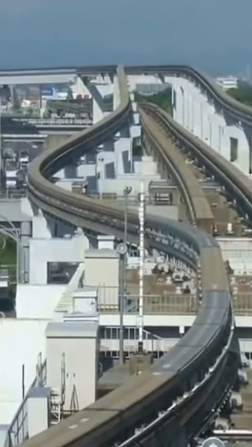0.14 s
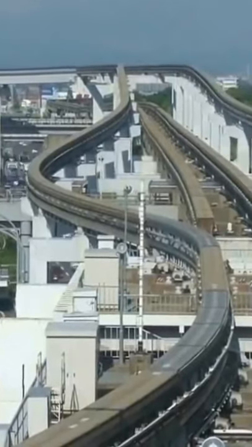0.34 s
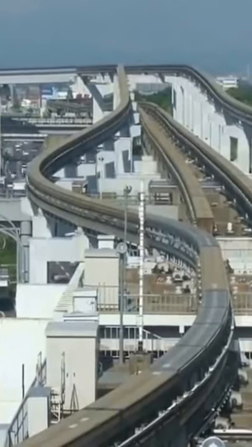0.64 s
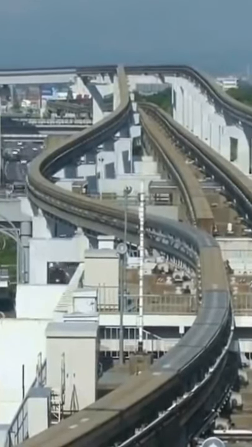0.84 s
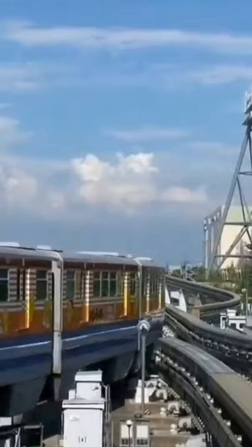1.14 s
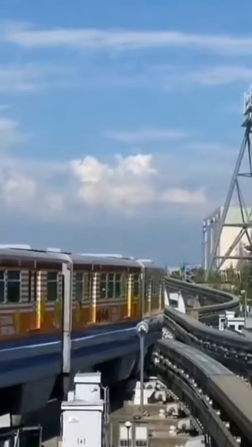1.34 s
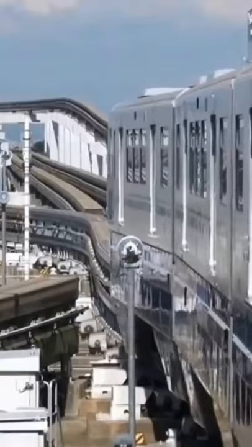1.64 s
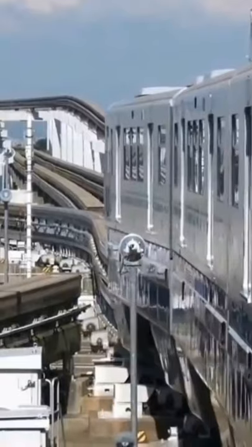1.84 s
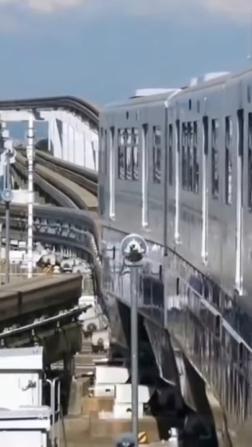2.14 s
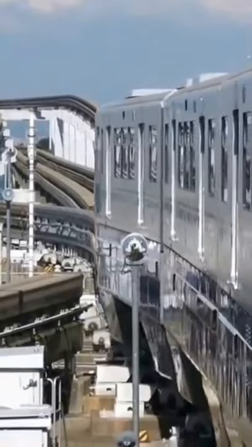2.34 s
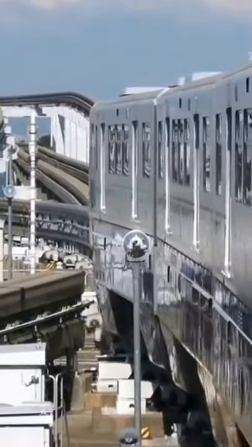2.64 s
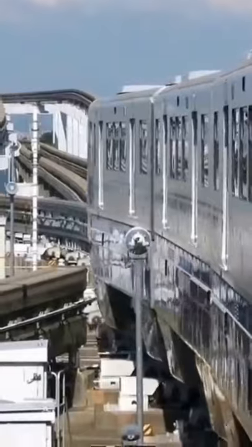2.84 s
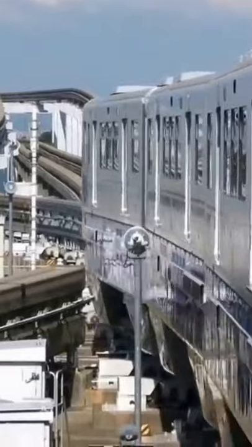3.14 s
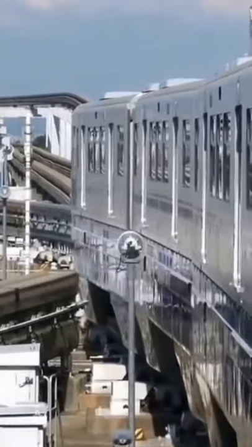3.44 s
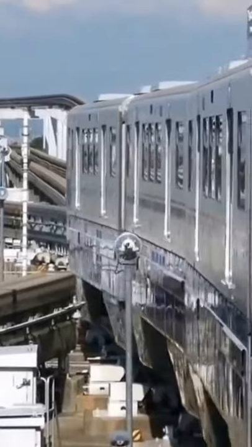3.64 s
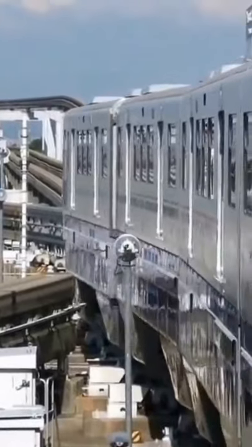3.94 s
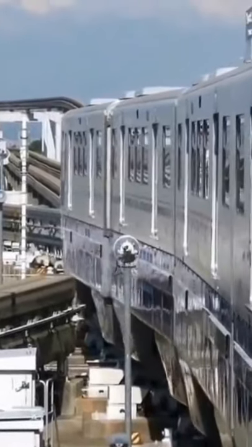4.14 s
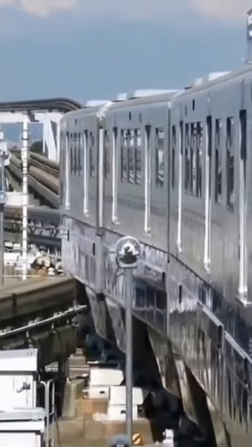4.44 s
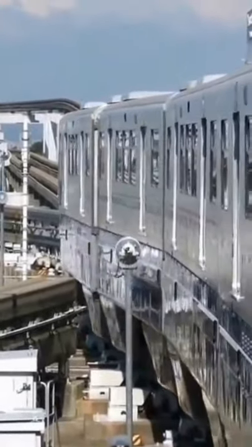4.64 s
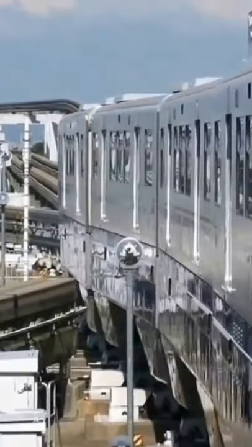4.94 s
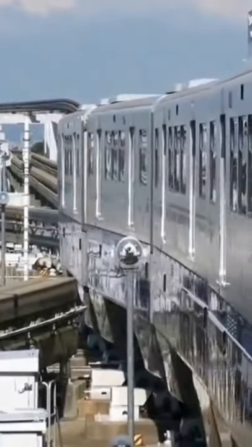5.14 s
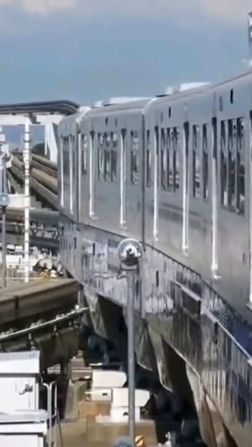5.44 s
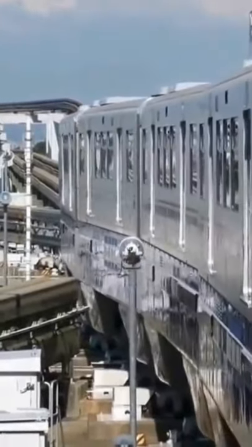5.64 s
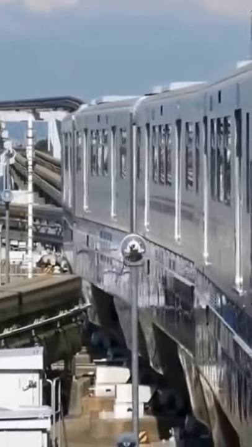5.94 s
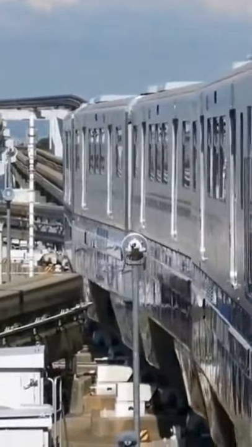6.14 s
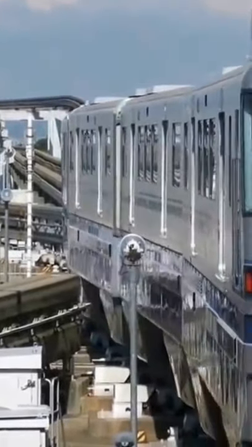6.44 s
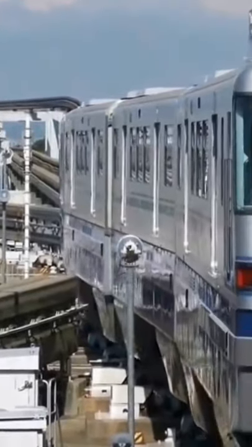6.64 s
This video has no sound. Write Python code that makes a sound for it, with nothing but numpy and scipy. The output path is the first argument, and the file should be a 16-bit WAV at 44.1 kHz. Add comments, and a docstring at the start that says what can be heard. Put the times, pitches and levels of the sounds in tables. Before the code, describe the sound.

A close motor drones under a thin steady whine and tyre hiss, then cuts abruptly to a quieter monorail whirring past with faint rubbery squeaks.

```python
"""Monorail train creeping past a platform

A monorail train creeps past an open platform. Its traction gear whines on two thin, wavering tones over
a hiss of tyres and air (coloured noise). The guide wheels squeak in short gliding noise bands, many of them
faint, and later a long thin squeal breaks off twice. At first a motor drones close by (a stack of tones over
a roar) and the train is louder; then a hard cut swaps the drone for a low rumble, with the train quieter.
"""
import sys
import numpy as np
from scipy import signal
from scipy.fft import rfft, irfft
from scipy.io import wavfile
from scipy.ndimage import uniform_filter1d

SR = 44100
rng = np.random.default_rng(int(sys.argv[2]) if len(sys.argv) > 2 else 0)


def bounce(signal):
    """Save signal as a 16-bit WAV file at the path given by the first command-line argument."""
    frames = np.transpose(np.atleast_2d(signal))
    limited = np.clip(frames, -1, 1)
    pcm = np.round(limited * 32767).astype(np.int16)
    wavfile.write(sys.argv[1], SR, pcm)


N = 299880  # samples in the whole scene


def undb(db):
    """Turn decibels into a plain gain."""
    return 10 ** (np.asarray(db) / 20)


def unit(x):
    """Scale a sound to an average strength (rms) of 1."""
    return x / np.sqrt(np.mean(x ** 2))


def curves(table):
    """Join the points of a table with straight lines; one curve for each column after the time."""
    t = np.arange(N) / SR
    point_s, *columns = np.transpose(table)
    return [np.interp(t, point_s, column) for column in columns]


def walk(rate, size=N):
    """A smooth random wander around 0, spread near 1, with about `rate` new values a second."""
    hold = max(int(SR / rate), 1)
    steps = np.repeat(rng.standard_normal(size // hold + 1), hold)
    smooth = uniform_filter1d(uniform_filter1d(steps, hold), hold)
    return 1.3 * smooth[:size]


def on_hz(table):
    """Turn a table of f/Hz, level/dB into a gain for every frequency of the spectrum."""
    hz, db = np.transpose(table)
    bins_hz = np.fft.rfftfreq(N, 1 / SR)
    return undb(np.interp(np.log(bins_hz + 1), np.log(hz), db))


def noise(gain, side_gain):
    """Stereo noise of a given colour, rms 1; the side part has opposite signs on left and right."""
    mid, side = rfft(rng.standard_normal((2, N))) * gain
    opposite = np.array([[1], [-1]])
    return unit(irfft(mid + side * side_gain * opposite, N))


def tone(hz):
    """A sine of rms 1 that follows a pitch curve from a random starting phase."""
    turns = np.cumsum(hz) / SR + rng.random()
    return np.sqrt(2) * np.sin(2 * np.pi * turns)


def narrow(hz, width_hz):
    """A thin noise band around a moving pitch: two waves a quarter turn apart, each wandering in size."""
    angle = 2 * np.pi * np.cumsum(hz) / SR
    rate = 2 * width_hz
    return walk(rate, len(hz)) * np.cos(angle) + walk(rate, len(hz)) * np.sin(angle)


def drone():
    """A motor: tones at whole multiples (orders) of its turning rate over the roar of its cooling air."""
    # the second order on its own: t/s, level/dB
    second_order = [(0, -48.5), (.36, -30), (.64, -28), (.91, -38), (1.02, -61.5), (1.18, -34.5),
                    (1.3, -37)]
    # other orders of the turning rate: multiple, middle level/dB
    other_orders = [(3, -39), (5, -34), (9, -42), (10, -36), (11, -46), (13, -44), (14, -49), (15, -41),
                    (16, -43), (17, -46), (18, -43), (19, -46), (21, -46), (22, -48), (23, -47), (27, -52),
                    (28, -55), (33, -54), (36, -55), (40, -55)]
    # extra tones that waver in pitch: middle f/Hz, middle level/dB
    fan_tones = [(172, -41.5), (245, -42), (828, -39.5)]
    # colour of the roar: f/Hz, relative level/dB
    roar_colour = [(15, -73.5), (25, -32.5), (76, -16), (230, -17), (300, -17.5), (350, -9), (430, -13.5),
                   (500, -8), (580, -13), (760, -19.5), (1350, -22), (1700, -30.5), (2800, -36),
                   (5000, -49.5)]
    # stereo width of the roar: f/Hz, side minus mid/dB
    roar_spread = [(25, -9), (100, -21.5), (300, -23), (1400, -12), (1600, -29), (3000, -16.5)]
    turn_hz, fourth_db, roar_db = 67.28, -21.5, -24
    sag_from_s, sag_db_per_s = 1, -9  # the drone weakens just before the cut
    left_over_right_db = 2

    sag_db = sag_db_per_s * np.clip(np.arange(N) / SR - sag_from_s, 0, 1)
    fourth_level_db = fourth_db + sag_db + .5 * walk(9.2)
    second_level_db, = curves(second_order)
    hz = np.full(N, turn_hz)
    tones = tone(4 * hz) * undb(fourth_level_db) + tone(2 * hz) * undb(second_level_db)
    tones += sum(tone(k * hz) * undb(db + 2.0 * walk(8)) for k, db in other_orders)
    tones += sum(tone(f + 3.0 * walk(10)) * undb(db + 3.1 * walk(5.8)) for f, db in fan_tones)
    roar_level_db = roar_db + .4 * sag_db + 1.5 * walk(20.13)
    roar = noise(on_hz(roar_colour), on_hz(roar_spread)) * undb(roar_level_db)
    balance_db = np.array([[.5], [-.5]]) * left_over_right_db
    return (tones + roar) * undb(balance_db)


def swings():
    """Brief smooth fades and swells of the whine, in dB, each shaped like a rounded bump."""
    # t/s of the middle, change/dB, half length/s
    bumps = [(0.267, -5, 0.038), (0.512, -2.5, 0.045), (1.083, -6.5, .03), (1.379, -6.5, 0.048),
             (1.46, -3.5, 0.03), (1.69, 5, 0.067), (2.1, -1.5, .3), (3.3, -1.5, 0.14), (3.448, 1, 0.058),
             (3.505, -8.5, 0.042), (4.24, -5.5, .035), (4.315, -6, 0.029), (5.3, -2.5, .07),
             (5.473, -5, .07), (6.052, -1.5, .1)]
    t = np.arange(N) / SR
    return sum(db * np.cos(np.pi / 2 * np.clip((t - middle) / half, -1, 1)) ** 2
               for middle, db, half in bumps)


def whine():
    """Two traction tones that waver in pitch and size; the low one goes sharp as it fades."""
    # middle pitch of the low tone: t/s, f/Hz
    low_pitch = [(0, 1588), (1.2, 1593), (1.65, 1589), (2.1, 1593), (2.9, 1589), (3.3, 1596), (3.45, 1589),
                 (4.2, 1593), (5.4, 1593), (6.1, 1589), (6.8, 1595)]
    # middle pitch of the high tone: t/s, f/Hz
    high_pitch = [(0, 5171), (2.65, 5181), (4.8, 5180), (6.8, 5175)]
    low_level_db, high_level_db = -37.5, -46  # middle levels, before the early lift
    sharp_hz_per_db = .8
    high_share = .3  # how much of each swing the high tone takes part in

    swing_db = swings()
    low_hz = curves(low_pitch)[0] - sharp_hz_per_db * np.minimum(swing_db, 0) + 1.5 * walk(10)
    low_db = low_level_db + swing_db + 0.33 * walk(9.9)
    high_hz = curves(high_pitch)[0]
    high_db = high_level_db + high_share * swing_db + .9 * walk(5.8)
    # a second, quicker wavering on top
    low = tone(low_hz + 3.2 * walk(30)) * undb(low_db + 1.0 * walk(35))
    high = tone(high_hz + 3.0 * walk(40)) * undb(high_db + 0.92 * walk(60))
    # on the right the high tone is weaker and a fraction of a sample early
    right_high = 0.59 * high + 0.25 * np.roll(high, -1)
    return low + np.array([high, right_high])


def hiss():
    """Tyre and air noise in four overlapping ranges, each flickering on its own, plus body resonances."""
    # swells of the hiss before range levels and lift:
    # t/s, level/dB, extra upper middle/dB, extra treble/dB
    train_levels = [(0, -43, -1.5, -4), (.6, -43.5, -0.5, -4), (.95, -41.5, -4, -5),
                    (1.085, -41, -2.5, -2.5), (1.12, -42.5, -3, -6.5), (1.3, -44, -2, -5),
                    (1.45, -44, -0.5, -6), (1.61, -46, 3, -1), (1.7, -39, -1.5, -4), (1.78, -42, -0.5, -3),
                    (2.3, -43.5, -2, -6), (2.49, -41, -0.5, -4), (2.68, -45, 0, -.5), (2.76, -42, -2, -2.5),
                    (2.85, -45, 0, -3), (2.95, -43, -.5, -1.5), (3.1, -44, -3, -4), (3.45, -43.5, -0.5, -4),
                    (3.7, -43, -4.5, -3), (3.87, -46, -3, -5), (4.15, -45.5, -3.5, -3),
                    (4.36, -45, -2.5, -4), (4.52, -44.5, -1.5, -4), (4.86, -44, 2, -6),
                    (4.96, -44.5, -2, -6.5), (5.43, -45.5, -4.5, -6), (6.0, -45, -1, -5.5),
                    (6.25, -42.5, 1.5, -7), (6.36, -45.5, -4.5, -8), (6.66, -44.5, -1, -3),
                    (6.8, -44, -3, -2.5)]
    # colour of the hiss: f/Hz, relative level/dB
    hiss_colour = [(300, -66), (560, -34.5), (780, -23.5), (830, -19.5), (1100, -17.5), (1450, -14.5),
                   (1700, -9.5), (2200, -17), (2500, -21), (3300, -18.5), (5400, -18.5), (8500, -21),
                   (11000, -21), (15500, -23.5)]
    # stereo width of the hiss: f/Hz, side minus mid/dB
    hiss_spread = [(600, -15.5), (900, -29), (1100, -54), (4300, -48.5), (5300, -21), (6000, -11.5),
                   (7200, -7), (8200, -11), (9500, -7.5), (12000, -7), (15000, -6.5)]
    # body resonances: middle f/Hz, approximate width/Hz, relative level/dB
    resonances = [(1032, 25, -65.5), (1157, 12, -60.5), (1191, 50, -56), (1310, 15, -63.5),
                  (1614, 100, -56.5), (1997, 60, -57), (2303, 48, -64.5), (3195, 80, -55.5),
                  (3883, 200, -55.5), (10600, 11, -64.5)]

    db, bright_db, air_db = curves(train_levels)
    octave = np.log2(np.fft.rfftfreq(N, 1 / SR) + 1)
    # soft steps from 0 to 1 around the three edges between the ranges
    above = [np.clip((octave - np.log2(edge_hz)) / 0.43 + .5, 0, 1) for edge_hz in (2300, 5200, 9700)]
    shares = (1 - above[0], above[0] - above[1], above[1] - above[2], above[2])
    # the rolling noise at the bottom follows the quick swells only in part
    rolling_db = -.6 * (db - uniform_filter1d(db, SR // 4))
    extras_db = (rolling_db, 0, bright_db, air_db)
    range_levels_db = (-6.5, -1.4, 1.78, 4.0)
    gust = walk(12)  # shared by all four ranges
    out = 0
    for share, extra_db, range_level_db in zip(shares, extras_db, range_levels_db):
        flicker_db = .5 * gust + .6 * walk(18) + 1.1 * walk(7.6)
        band = noise(on_hz(hiss_colour) * np.sqrt(share), on_hz(hiss_spread))
        out = out + band * undb(db + extra_db + range_level_db + flicker_db)
    body = sum(undb(peak_db) * narrow(hz * (1 + .003 * walk(3)), width)
               for hz, width, peak_db in resonances)
    # the treble is slightly stronger on the right
    out[1] -= 0.055 * np.gradient(np.gradient(out[1]))
    return out + body * undb(db + rolling_db - np.median(db))


def squeaks():
    """Rubber slips on the beam: thin gliding bands that swell, stutter and fade, among many fainter ones."""
    # start t/s, length/s, first f/Hz, glide/Hz, approximate core width/Hz, level before the lift/dB
    clear_squeaks = [(.46, 0.17, 3990, 54, 54, -48.5), (.62, 0.12, 3940, -76, 50, -45),
                     (.82, .03, 5750, -50, 87, -53), (.95, 0.066, 6330, -50, 100, -45),
                     (1.04, 0.11, 6070, -250, 53, -50), (1.38, 0.33, 10150, 101, 200, -52.5),
                     (1.46, 0.07, 4250, -100, 240, -46.5), (1.5, .26, 6380, -330, 80, -51),
                     (1.62, 0.036, 4050, -50, 100, -46), (1.65, .11, 5420, -150, 140, -44),
                     (1.79, 0.12, 3370, -37, 60, -44.5), (1.8, .34, 7260, -500, 65, -52),
                     (1.9, 0.11, 3560, -110, 34, -43.5), (2.2, 0.35, 631, 3.5, 30, -67.5),
                     (2.36, 0.34, 3150, -440, 100, -51), (2.44, 0.073, 10500, -400, 150, -42),
                     (2.44, .06, 9500, -150, 180, -49), (2.45, .15, 6170, -200, 150, -49),
                     (2.48, 0.11, 7870, -50, 130, -51), (2.7, 0.115, 2680, -120, 81, -50),
                     (2.86, 0.11, 1040, -20, 19, -53.5), (2.88, 0.095, 5800, -10, 300, -46),
                     (2.96, 0.065, 7550, -50, 170, -47), (3.14, .08, 10500, -10, 150, -48),
                     (4.52, 0.16, 6000, -30, 170, -50), (4.6, 0.11, 1006, -32, 22, -52),
                     (4.65, 0.067, 3200, 30, 56, -46), (4.7, .5, 982, -81.5, 15, -63.5),
                     (6.15, .17, 3344, -160, 76, -44.5), (6.16, .1, 5450, -10, 100, -47),
                     (6.2, 0.11, 6500, -190, 80, -48)]
    faint_count = 150
    faint_db, faint_range_db, faint_db_per_octave = -65, 6, 3.5  # faint_db is the least level at 3000 Hz

    start, length, pitch, glide, size = rng.random((faint_count, 5)).T
    start = start * (N / SR - .3)
    hz = 820 * 11.5 ** pitch
    level_db = faint_db + faint_range_db * size + faint_db_per_octave * np.log2(hz / 3000)
    faint = np.transpose([start, 0.05 + 0.18 * length, hz, -.03 * glide * hz, .015 * hz, level_db])
    out = np.zeros(N)
    for start, length, first_hz, change_hz, width, db in [*clear_squeaks, *faint]:
        a, b = int(start * SR), int((start + length) * SR)
        stutter = undb(2.0 * walk(40, b - a))
        swell = np.sin(np.linspace(0, np.pi, b - a)) ** .4 * stutter
        glide_hz = np.linspace(first_hz, first_hz + change_hz, b - a)
        # a weaker rasp, five times as wide, surrounds the core
        core = narrow(glide_hz, width)
        rasp = undb(-9.0) * narrow(glide_hz, 5.0 * width)
        out[a:b] += undb(db) * unit(swell * (core + rasp))
    return out


def rumble():
    """Low noise that swells and sinks, heard after the cut."""
    # t/s, middle level/dB
    rumble_levels = [(1.32, -48), (1.36, -67), (1.56, -72.5), (1.73, -60), (2.26, -67), (2.65, -64),
                     (2.74, -57.5), (2.85, -66), (3.53, -66.5), (3.67, -61.5), (3.81, -69.5), (4.83, -69),
                     (5.06, -74), (6.8, -70)]
    # f/Hz, relative level/dB
    rumble_colour = [(12, -35), (20, -3.5), (140, -4.5), (184, -4.5), (375, -4.5), (640, -3.5), (700, -4),
                     (910, -12), (1540, -120)]
    level_db = curves(rumble_levels)[0] + 1.4 * walk(15)
    return noise(on_hz(rumble_colour), undb(-9.0)) * undb(level_db)


def squeal():
    """A long squeal that breaks off twice: two thin bands that hold their pitch and waver in size."""
    # the three stretches of the squeal: start t/s, end t/s
    stretches = [(4.34, 4.58), (4.641, 5.22), (5.26, 5.56)]
    # middle f/Hz, approximate width/Hz, level/dB
    bands = [(8860, 55, -52), (7130, 32, -59)]
    out = np.zeros(N)
    for a, b in (np.array(stretches) * SR).astype(int):
        waver = undb(2.4 * walk(14, b - a))
        swell = np.sin(np.linspace(0, np.pi, b - a)) ** 0.17 * waver
        out[a:b] = sum(undb(db) * unit(swell * narrow(np.full(b - a, hz), width))
                       for hz, width, db in bands)
    return out


def scene():
    """Add the train's sounds, lifted before the cut, to the drone and then, after the cut, to the rumble."""
    cut_s, early_lift_db = 1.3095, 8.5
    before = np.arange(N) / SR < cut_s
    train = whine() + hiss() + squeaks() + squeal()
    train = train * undb(early_lift_db * before)
    return train + np.where(before, drone(), rumble())


def record(dry):
    """A steep low-pass filter removes the very top of the treble."""
    top_hz = 15480
    low_pass = signal.ellip(16, .3, 80, top_hz, fs=SR, output="sos")
    return signal.sosfilt(low_pass, dry)


dry = scene()
out = record(dry)
bounce(out)
```